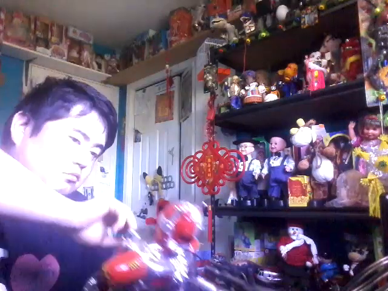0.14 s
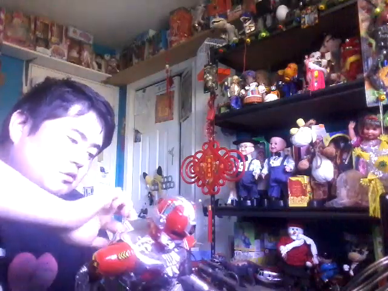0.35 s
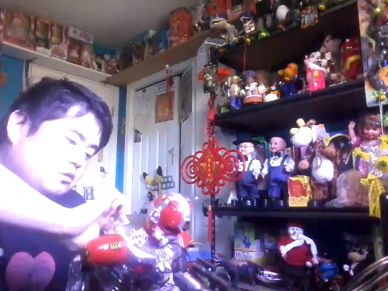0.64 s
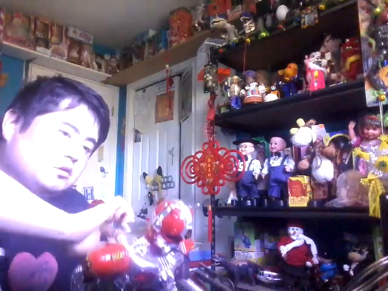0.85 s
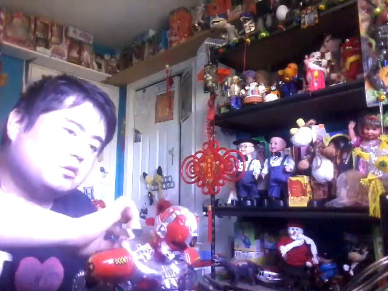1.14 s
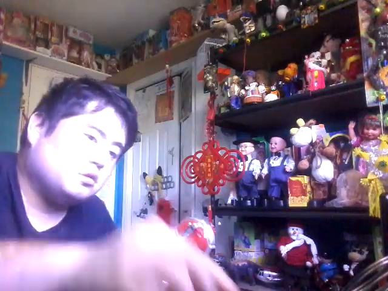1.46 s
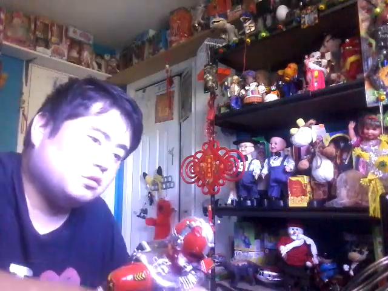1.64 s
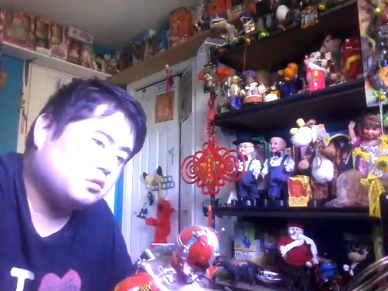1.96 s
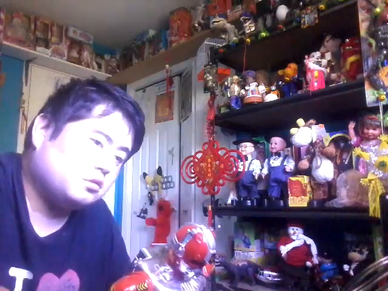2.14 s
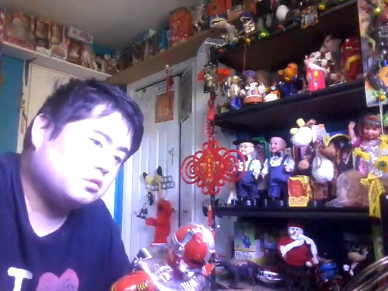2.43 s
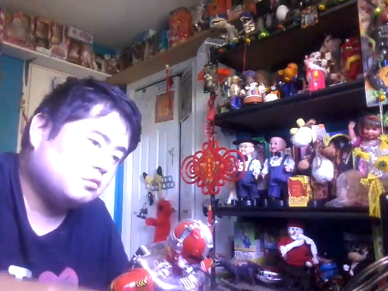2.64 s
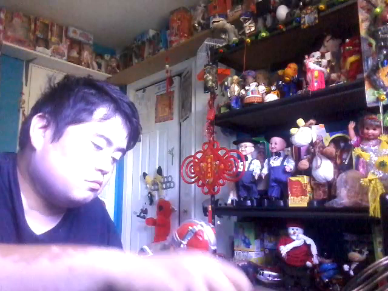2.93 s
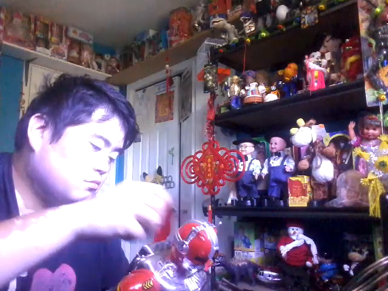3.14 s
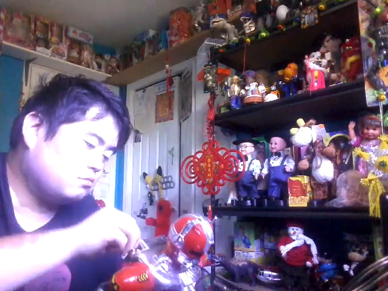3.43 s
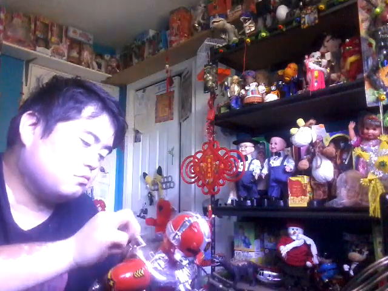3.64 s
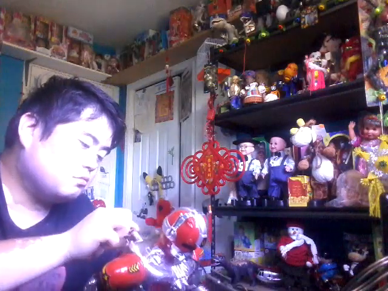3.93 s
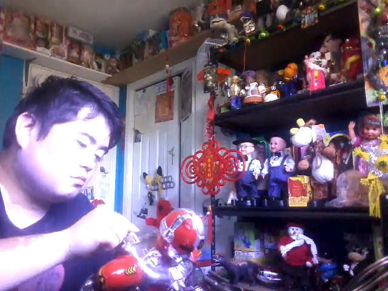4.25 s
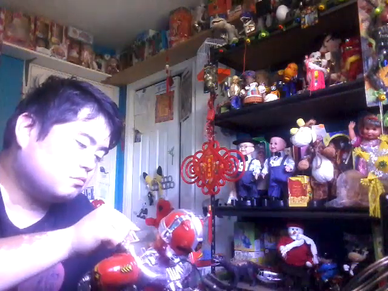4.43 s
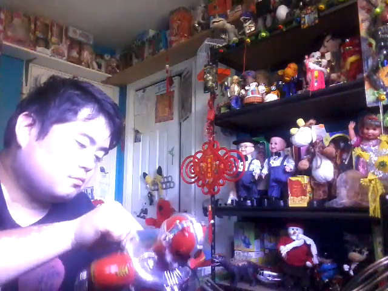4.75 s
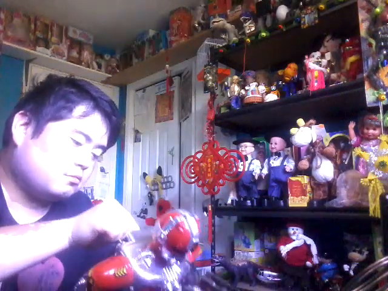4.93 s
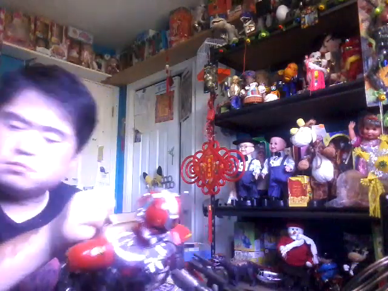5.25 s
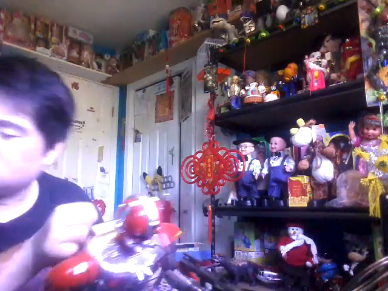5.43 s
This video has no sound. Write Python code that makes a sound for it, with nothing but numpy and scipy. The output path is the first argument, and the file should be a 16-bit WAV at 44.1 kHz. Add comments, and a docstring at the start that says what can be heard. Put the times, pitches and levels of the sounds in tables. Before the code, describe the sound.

In a small room with little echo, two computer fans hum under light microphone hiss. A crisp plastic clack with a metallic tick marks a battery going into a toy, and a spring zings faintly. A quick patter of dull knocks on the desk follows. Then the next battery clicks and rattles against the hollow plastic, snaps into place, and the toy gets a few last light touches.

```python
"""Batteries go into a hollow plastic toy at a desk in a small, cluttered room; two computer fans hum.
0.26 s: the first snaps home with a plastic clack, a metal tick and a thump of the cavity.
1 s: it slips on its coil spring, which zings.
2-2.5 s: fingers fumble for the next, which knocks on the desk top.
From 3.1 s: it knocks about in its slot, snaps in at 4.5 s, and a few light touches follow."""
import sys
import numpy as np
from scipy import signal
from scipy.fft import rfft, irfft
from scipy.io import wavfile
from scipy.ndimage import uniform_filter1d

SR = 44100
rng = np.random.default_rng(int(sys.argv[2]) if len(sys.argv) > 2 else 0)


def inscribe(sig):
    """Save sig as 16-bit PCM at rate SR to the path in sys.argv[1].

    A 1-D sig is mono; a 2-D sig holds one channel per row.
    Samples are clipped to [-1, 1] before scaling.
    """
    pcm = np.round(np.clip(np.atleast_2d(sig).T, -1, 1) * 32767)
    wavfile.write(sys.argv[1], SR, pcm.astype(np.int16))


N = 246283

# slow fan tones: order, rms_db
SLOW_FAN_TONES = [(3, -60), (4, -63.5), (5, -66.5), (11, -62.5), (14, -65.5), (17, -83), (18, -68)]
# fast fan tones: order, rms_db
FAST_FAN_TONES = [(1, -70), (2, -70), (3, -59.5), (4, -66), (7, -58.5), (12, -74.5), (17, -71.5),
                  (18, -73.5), (20, -69.5)]
# fast fan whine: time_s, rms_db
WHINE_ENVELOPE = [(0, -59), (3.0, -62), (4.1, -70), (5.5, -69.5)]
# fan air rush: freq_hz, gain_db
AIR_SPECTRUM = [(25, -34), (42, -11.5), (68, -4.5), (110, -1), (290, 0.5), (520, 0), (790, 6), (1000, -2),
                (1600, -5), (2050, -5), (2250, -2), (2700, -9.5), (3200, -7.5), (5000, -38)]
# microphone hiss: freq_hz, gain_db
MIC_HISS_SPECTRUM = [(2000, -13), (4100, 6.5), (4800, 2), (5600, 4), (6300, -1.5), (6900, -3.5),
                     (7600, 2.5), (8900, 4), (9600, -8.5), (10700, -17.5), (12000, -24), (14200, -10),
                     (15700, -12)]
# faint noise, different in each channel: freq_hz, gain_db
CHANNEL_HISS_SPECTRUM = [(40, -14), (200, 1), (4000, 18.5), (10000, 7.5)]
# hard tick: freq_hz, gain_db
TICK_SPECTRUM = [(300, -66), (1000, 7), (2200, 2.5), (3100, 4.5), (4100, 2), (4900, 6), (5600, 4),
                 (6400, 4), (7500, 5), (8800, 9.5), (9700, 1.5), (10800, -8), (12500, -12.5), (16000, -14)]
# desk top: freq_hz, width_hz, gain_db
DESK_MODES = [(220, 44, 4), (348.3, 8.1, 15), (550, 18, 2), (700, 180, 1.5), (910, 94, 2.5),
              (1064, 45, 4.5), (1920, 190, 4.5)]
# coil spring: freq_hz, width_hz, gain_db
SPRING_MODES = [(996, 24, 7.5), (2174, 49, -8), (2700, 37, -3.5), (3150, 200, -11.5), (4740, 69, -9),
                (5070, 78, -2), (5380, 55, -19)]
# toy shell and battery contacts: freq_hz, width_hz, gain_db
SHELL_MODES = [(454, 20, 3), (812, 80, 6), (1068, 44, 2.5), (1206, 86, -4), (1450, 31, -16.5),
               (1694, 38, 2.5), (1933, 41, 0), (2060, 86, 1.5), (2345, 37, -2), (3210, 230, -5),
               (3820, 180, -1), (4830, 470, -6), (6370, 250, -7), (8670, 440, -19)]
# loose battery on the desk: start_s, drive_db, pitch_hz
DESK_KNOCKS = [ (1.9524, -38, 664), (1.9641, -40.5, 1690), (2.001, -36, 1460), (2.0104, -37.5, 740),
               (2.047, -35.5, 650), (2.0648, -28.5, 970), (2.071, -34, 1800), (2.0885, -29.5, 1060),
               (2.1073, -38.5, 1110), (2.123, -36, 1650), (2.132, -38.5, 1620), (2.1718, -35, 1170),
               (2.1855, -38, 1420), (2.197, -33.5, 1230), (2.2308, -40, 940), (2.2406, -38, 1100),
               (2.2847, -30.5, 1230), (2.332, -41, 1600), (2.342, -34, 1300), (2.497, -40, 990)]
# battery slips on the spring: start_s, drive_db
SPRING_SLIPS = [(0.9923, -46.5), (1.009, -43.5), (1.029, -46), (1.047, -52), (1.062, -45), (1.4968, -51.5),
                (3.595, -44.5), (4.511, -39), (4.556, -47.5)]
# battery touches the toy: start_s, clack_drive_db, hardness (0 plastic, 1 metal), pitch_hz
TOY_TOUCHES = [ (.1415, -27.5, 0.57, 1320), (0.4014, -45, 0.5, 2480), (.7198, -45, 0.88, 1060),
               (.750, -42, 0.66, 1020), (1.4967, -50.5, 0.74, 1400), (3.147, -36, 0.37, 1000),
               (3.2981, -27, 0.23, 1045), (3.2996, -32, 0, 2200), (3.338, -46, 0, 710),
               (3.595, -23.5, 0, 1550), (3.646, -27, 0.14, 1500), (3.657, -35, 0, 1620),
               (3.682, -34, 0.14, 950), (4.0596, -38.5, 0.17, 1150), (4.2205, -42, .3, 1580),
               (4.229, -45.5, 0.24, 3000), (4.257, -46.5, 0.84, 1200), (4.3264, -35, 0.5, 1730),
               (4.387, -48, 0.78, 1310), (4.394, -30, 0.65, 1610), (4.4685, -24, 0.58, 1170),
               (4.478, -26.5, 0.51, 1180), (4.5815, -41.5, 0.45, 1200), (4.7, -43, 0.69, 1500),
               (4.7085, -32.5, 0.23, 1520), (4.783, -42.5, 0.34, 2060), (5.447, -41.5, .3, 980),
               (5.535, -48.5, 0.75, 1200), (5.5675, -36.5, 0.6, 1710)]
# battery snaps into its slot: start_s, clack_drive_db, tick_drive_db, pitch_hz
SLOT_SNAPS = [(0.2606, -18, -14, 1640), (4.4848, -28, -19, 1020)]

SLOW_FAN_HZ, FAST_FAN_HZ = 39.76, 115.42   # turns per second
WHINE_ORDER, WHINE_RUSH_DB, WHINE_WIDTH_HZ = 19, -8.5, 300
AIR_DB, MIC_HISS_DB, CHANNEL_HISS_DB = -52, -62, -78.5
ROOM_T60_S, CUTOFF_HZ = 0.22, 15900
FUMBLE_START_S, FUMBLE_END_S, PATS_PER_S, PAT_DRIVE_DB = 1.97, 2.35, 36, -41.5
THUD_RE_KNOCK_DB, SHAKE_RE_THUD_DB = -5.5, -12.5
# pairs: on plastic, on metal
TICK_RE_CLACK_DB, THUMP_RE_CLACK_DB = (-20, 8.5), (-0.5, -9.5)
CHATTER_S, CLACK_OCTAVES = (0.0072, 0.0055), (0.39, 0.98)
THUMP_DB_PER_OCTAVE = -21.5   # clacks above 1 kHz come from the rim and stir the cavity less
SNAP_CHATTER_S, SNAP_OCTAVES, SNAP_THUMP_RE_CLACK_DB = 0.00091, 0.64, -17
REBOUND_LAG_S, REBOUND_DB, REBOUND_CHATTER_S = 0.002, -5.5, 0.0024


def from_db(db):
    """Decibels to gain."""
    return 10 ** (np.asarray(db) / 20)


def unit_rms(x):
    """Scale to rms 1."""
    return x / np.sqrt(np.mean(x ** 2) + 1e-20)


def curve_gain(spectrum, hz):
    """Gain of a spectrum table, interpolated over log frequency."""
    table_hz, gain_db = np.transpose(spectrum)
    return from_db(np.interp(np.log(hz + 1), np.log(table_hz), gain_db))


def coloured_noise(spectrum):
    """Steady shaped noise, rms 1."""
    gain = curve_gain(spectrum, np.fft.rfftfreq(N, 1 / SR))
    return unit_rms(irfft(rfft(rng.standard_normal(N)) * gain, N))


def colour(x, spectrum, size=512):
    """Minimum-phase filter from a spectrum table."""
    cepstrum = irfft(np.log(curve_gain(spectrum, np.fft.rfftfreq(size, 1 / SR))))
    causal_fold = 1 + np.sign(np.fft.fftfreq(size))
    impulse_response = irfft(np.exp(rfft(cepstrum * causal_fold)))
    return signal.lfilter(impulse_response, [1], x)


def whiten(x, smooth_hz):
    """Flatten the spectrum of a short burst."""
    spectrum = rfft(x, 2 * len(x))
    bins = max(1, round(smooth_hz * 2 * len(x) / SR))
    power = uniform_filter1d(np.abs(spectrum) ** 2, bins)
    return irfft(spectrum / np.sqrt(power + 1e-12))[:len(x)]


def band(x, hz, octaves):
    """Band-pass, reaching the given octaves to each side of hz."""
    edges_hz = [hz / 2 ** octaves, min(hz * 2 ** octaves, SR / 2 - 1000)]
    return signal.sosfilt(signal.butter(2, edges_hz, "band", fs=SR, output="sos"), x)


def resonate(x, hz, width_hz):
    """One resonance, peak gain 1."""
    radius = np.exp(-np.pi * width_hz / SR)
    numerator = np.array([1, 0, -1]) * (1 - radius ** 2) / 2
    denominator = [1, -2 * radius * np.cos(2 * np.pi * hz / SR), radius ** 2]
    return signal.lfilter(numerator, denominator, x + 1e-18)


def ring(force, modes):
    """Summed modes of a struck object."""
    return sum(from_db(db) * resonate(force, hz, width_hz) for hz, width_hz, db in modes)


def add(track, start_s, burst, level_db):
    """Mix in a burst; level_db is its energy spread over 10 ms."""
    start = round(start_s * SR)
    scaled = burst / np.linalg.norm(burst) * np.sqrt(SR / 100) * from_db(level_db)
    track[start:start + len(scaled)] += scaled[:N - start]


def room(x, wet_db):
    """Direct sound plus dense, short reflections off shelves and walls."""
    t = np.arange(SR // 2) / SR
    echoes = whiten(rng.standard_normal(len(t)) * from_db(-60 * t / ROOM_T60_S), smooth_hz=125.5)
    echoes *= 1 - np.exp(-(t / 0.0021) ** 2)   # travel time to the nearest surfaces
    return x + from_db(wet_db) * signal.fftconvolve(x, echoes / np.linalg.norm(echoes))[:N]


def wavering_tone(hz, wander_hz):
    """Sine of rms 1 with slight random pitch drift."""
    knots_s = np.arange(0, N / SR + 1, 0.05)
    drift = np.interp(np.arange(N) / SR, knots_s, rng.standard_normal(len(knots_s)))
    cycles = np.cumsum(hz + wander_hz * drift) / SR + rng.random()
    return np.sqrt(2) * np.sin(2 * np.pi * cycles)


def whine():
    """One high tone of the fast fan in a narrow rush of air; drops after 3 s."""
    hz = WHINE_ORDER * FAST_FAN_HZ
    rush = unit_rms(band(rng.standard_normal(N), hz, octaves=np.log2(1 + WHINE_WIDTH_HZ / hz)))
    level_db = np.interp(np.arange(N) / SR, *np.transpose(WHINE_ENVELOPE))
    return from_db(level_db) * (wavering_tone(hz, wander_hz=2.81) + from_db(WHINE_RUSH_DB) * rush)


def fans():
    """Motor and blade tones at multiples of two shaft speeds, plus whine and rushing air."""
    hum = np.zeros(N)
    for shaft_hz, tones in (SLOW_FAN_HZ, SLOW_FAN_TONES), (FAST_FAN_HZ, FAST_FAN_TONES):
        for order, rms_db in tones:
            hz = order * shaft_hz
            hum += from_db(rms_db) * wavering_tone(hz, wander_hz=0.084 * np.sqrt(hz))
    return hum + whine() + from_db(AIR_DB) * coloured_noise(AIR_SPECTRUM)


def contact(chatter_s, impulse_db):
    """Contact force: one impulse, then a decaying chatter of tiny rebounds."""
    t = np.arange(SR // 12) / SR
    chatter = rng.standard_normal(len(t)) * np.exp(-t / chatter_s)
    impulse = from_db(impulse_db) * (t == 0)
    return whiten(chatter / np.linalg.norm(chatter) + impulse, smooth_hz=60)


def tick(chatter_s, impulse_db, strength_db):
    """Hard tick; a lighter touch means longer contact, so less top treble."""
    top_hz = np.interp(strength_db, [-42, -15], [10500, 17000])
    burst = colour(contact(chatter_s, impulse_db), TICK_SPECTRUM)
    return signal.sosfilt(signal.butter(4, top_hz, fs=SR, output="sos"), burst)


def finger_pats():
    """Unevenly timed pats on the desk: start_s, drive_db."""
    slots_s = np.arange(FUMBLE_START_S, FUMBLE_END_S, 1 / PATS_PER_S)
    return [(slot_s + rng.random() / PATS_PER_S, PAT_DRIVE_DB) for slot_s in slots_s]


def desk():
    """Dull battery knocks; the desk top thuds and shakes under them and under the fingers."""
    force = np.zeros(N)
    for start_s, knock_db, hz in DESK_KNOCKS:
        add(force, start_s, band(contact(0.0019, impulse_db=-0.5), hz, octaves=0.49), knock_db)
        add(force, start_s, tick(0.0026, impulse_db=-14, strength_db=knock_db - 24), knock_db - 23)
    thuds = [(start_s, knock_db + THUD_RE_KNOCK_DB) for start_s, knock_db, _ in DESK_KNOCKS]
    for start_s, thud_db in thuds + finger_pats():
        thud = band(contact(0.0071, impulse_db=-3), hz=460, octaves=0.84)
        shake = band(contact(0.0092, impulse_db=-21), hz=151, octaves=0.77)
        add(force, start_s, thud, thud_db)
        add(force, start_s, shake, thud_db + SHAKE_RE_THUD_DB)
    return from_db(-8) * (force + ring(force, DESK_MODES))


def spring():
    """The coil zings at each slip of the battery."""
    force = np.zeros(N)
    for start_s, slip_db in SPRING_SLIPS:
        add(force, start_s, contact(0.0022, impulse_db=9), slip_db)
    return from_db(20) * ring(force, SPRING_MODES)


def touches():
    """Blows of battery on toy; harder ones are shorter and wider in band, with more tick, less thump."""
    for start_s, clack_db, hardness, hz in TOY_TOUCHES:
        tick_db = clack_db + np.interp(hardness, [0, 1], TICK_RE_CLACK_DB)
        thump_db = clack_db + np.interp(hardness, [0, 1], THUMP_RE_CLACK_DB)
        thump_db += THUMP_DB_PER_OCTAVE * np.log2(hz / 1000)
        octaves = np.interp(hardness, [0, 1], CLACK_OCTAVES)
        chatter_s = np.interp(hardness, [0, 1], CHATTER_S)
        yield start_s, clack_db, tick_db, thump_db, hz, octaves, chatter_s


def snaps():
    """Blows of a battery snapping home: one sharp strike, one weaker rebound."""
    for start_s, clack_db, tick_db, hz in SLOT_SNAPS:
        thump_db = clack_db + SNAP_THUMP_RE_CLACK_DB
        yield start_s, clack_db, tick_db, thump_db, hz, SNAP_OCTAVES, SNAP_CHATTER_S
        yield (start_s + REBOUND_LAG_S, clack_db + REBOUND_DB, tick_db + REBOUND_DB,
               thump_db + REBOUND_DB, hz, SNAP_OCTAVES, REBOUND_CHATTER_S)


def toy():
    """Each blow drives the shell with a plastic clack, metal tick and cavity thump; slips only tick."""
    force = np.zeros(N)
    for start_s, clack_db, tick_db, thump_db, hz, octaves, chatter_s in [*touches(), *snaps()]:
        add(force, start_s, band(contact(chatter_s, impulse_db=-23.5), hz, octaves), clack_db)
        add(force, start_s, tick(chatter_s, impulse_db=-5, strength_db=tick_db), tick_db)
        add(force, start_s, band(contact(0.016, impulse_db=1), hz=427, octaves=0.32), thump_db)
    for start_s, slip_db in SPRING_SLIPS:
        add(force, start_s, tick(0.0071, impulse_db=-9, strength_db=slip_db), slip_db + 5.5)
    return from_db(-7.5) * (force + ring(force, SHELL_MODES))


def scene():
    """Toy and desk in the room, over fans and hiss; one microphone on both channels."""
    handling = room(toy() + spring(), wet_db=-5) + room(desk(), wet_db=-7.5)
    mono = handling + fans() + from_db(MIC_HISS_DB) * coloured_noise(MIC_HISS_SPECTRUM)
    return np.array([mono, mono])


def record(dry):
    """A faint noise that differs between the two channels, then a steep low-pass."""
    hiss = np.array([coloured_noise(CHANNEL_HISS_SPECTRUM) for _ in dry])
    low_pass = signal.ellip(10, 0.1, 80, CUTOFF_HZ, fs=SR, output="sos")
    return signal.sosfilt(low_pass, dry + from_db(CHANNEL_HISS_DB) * hiss)


dry = scene()
out = record(dry)
inscribe(out)
```